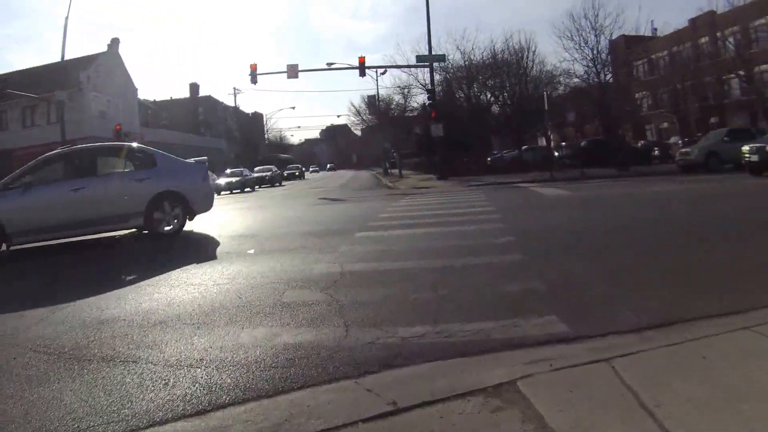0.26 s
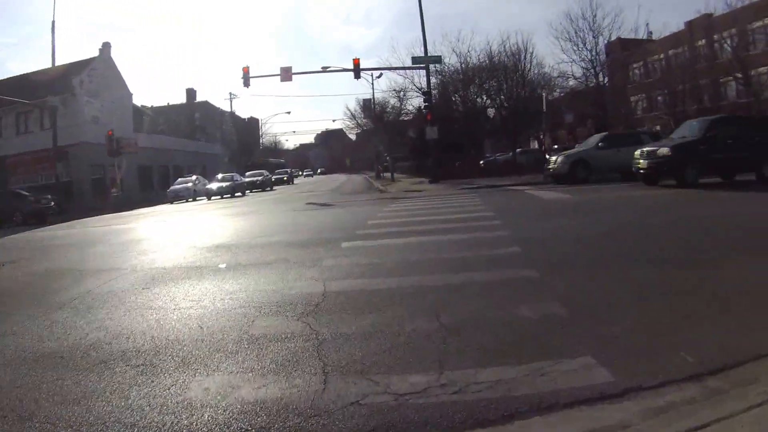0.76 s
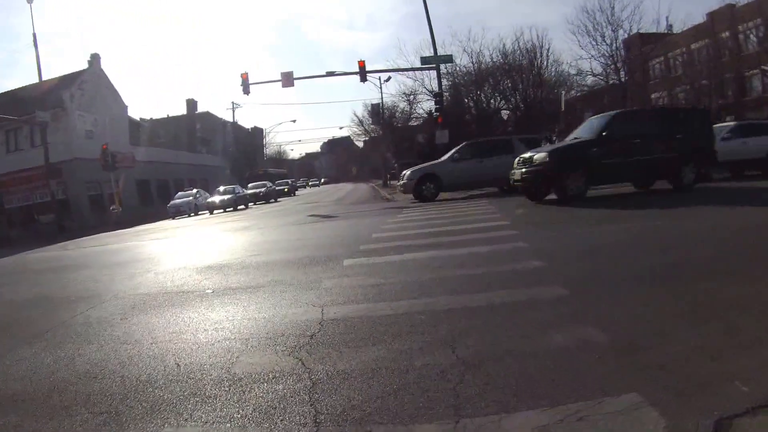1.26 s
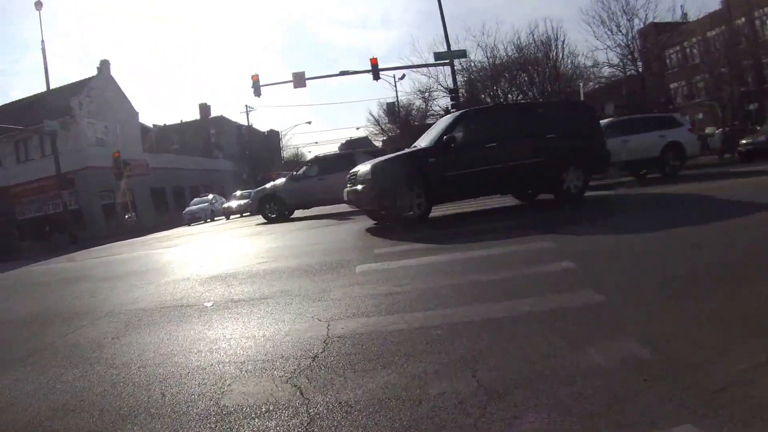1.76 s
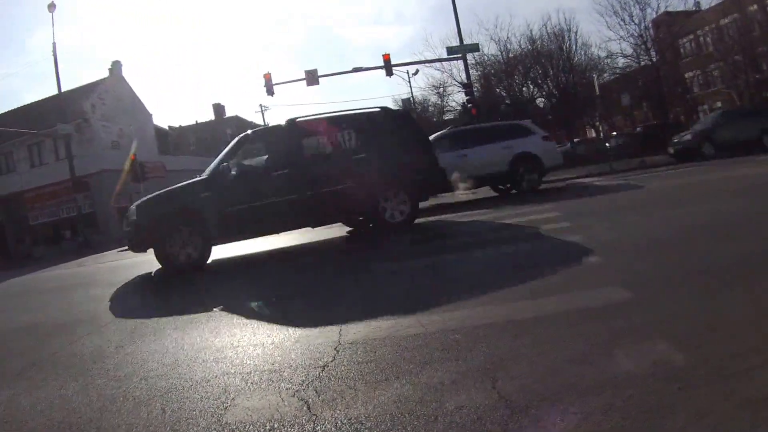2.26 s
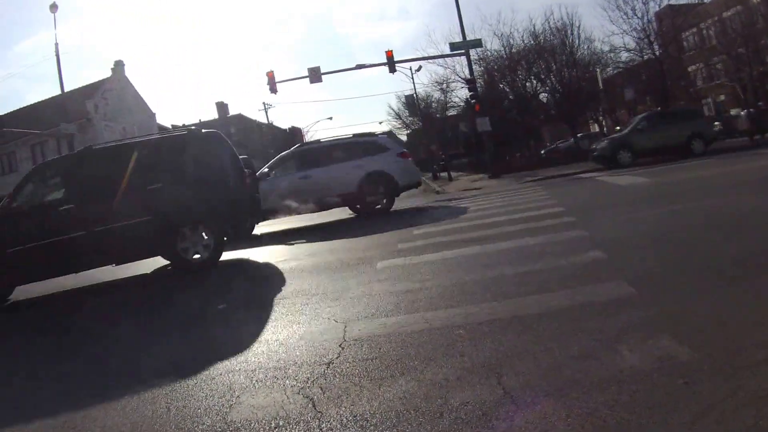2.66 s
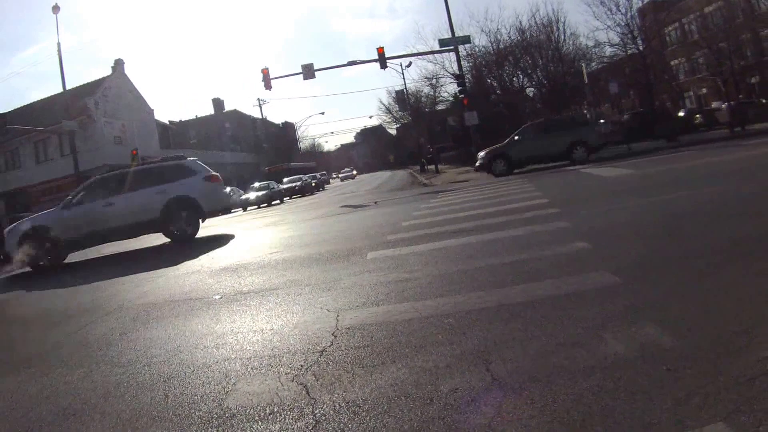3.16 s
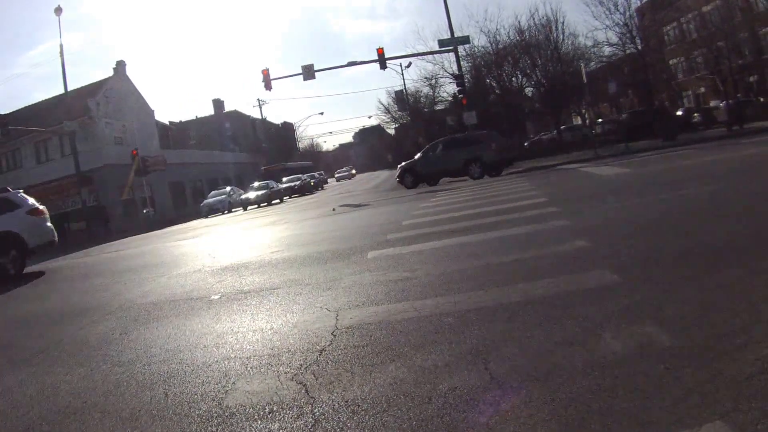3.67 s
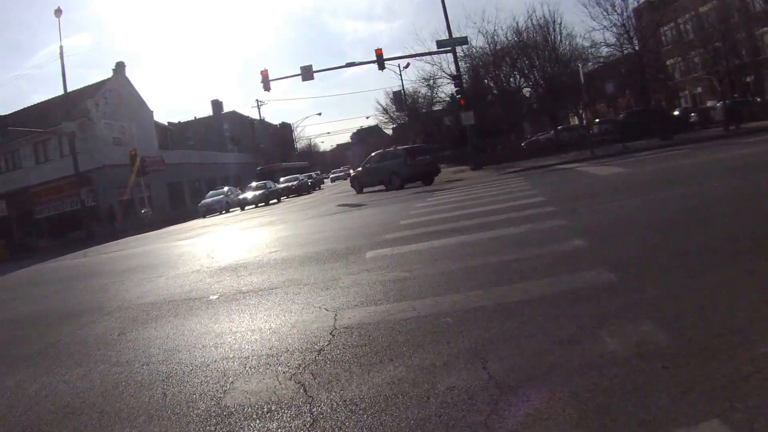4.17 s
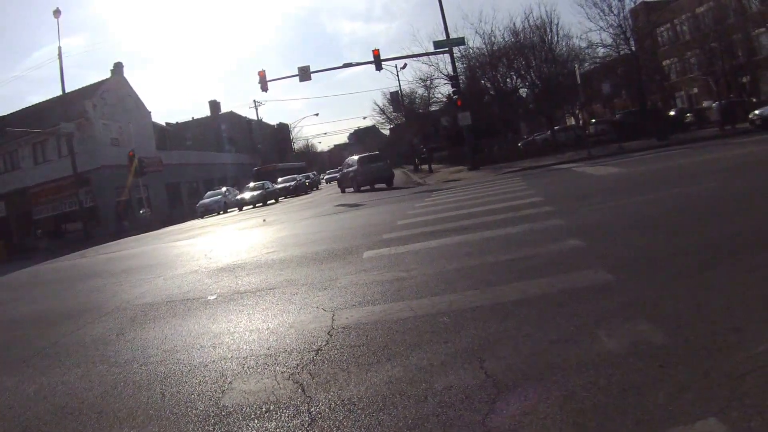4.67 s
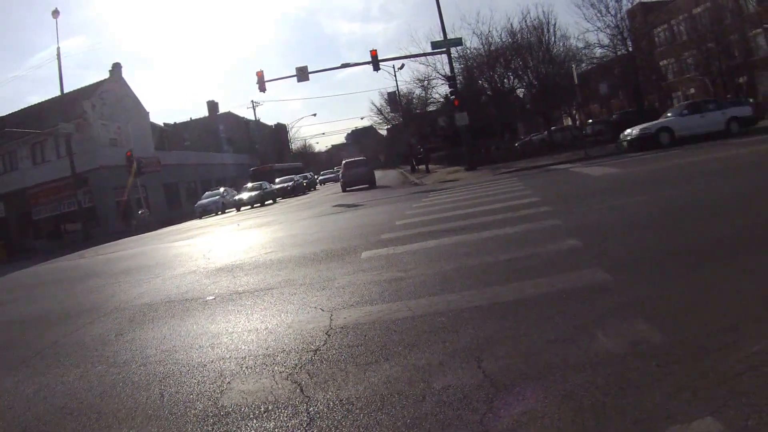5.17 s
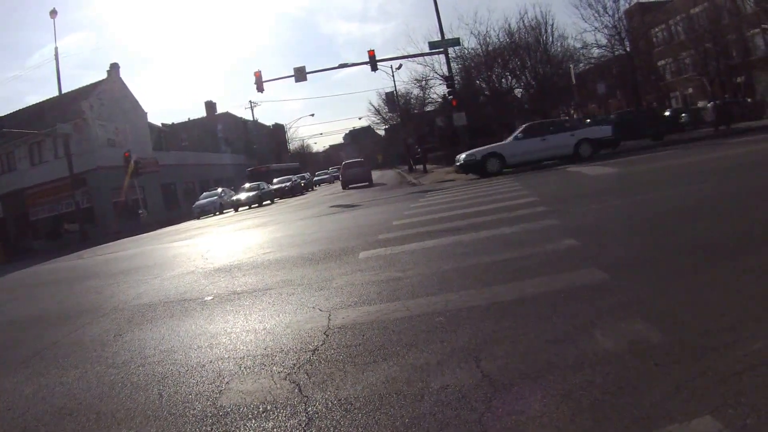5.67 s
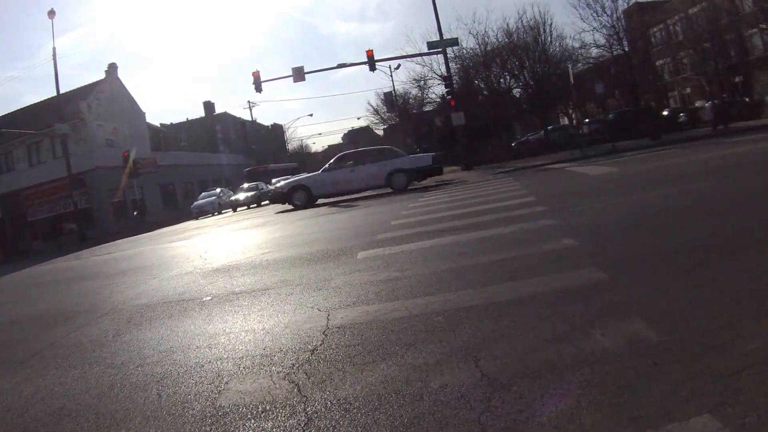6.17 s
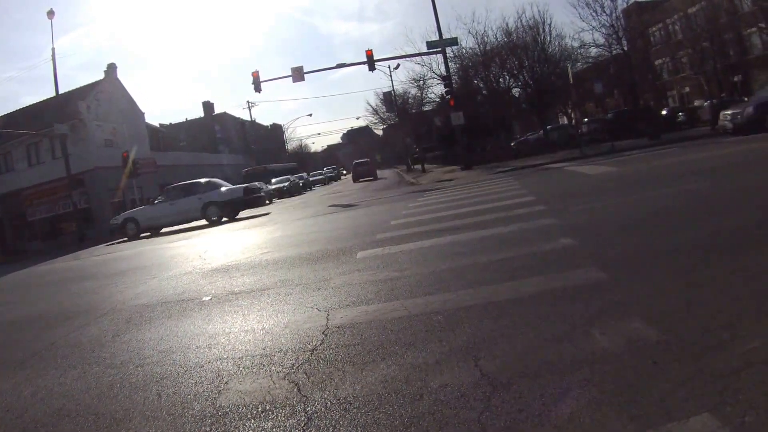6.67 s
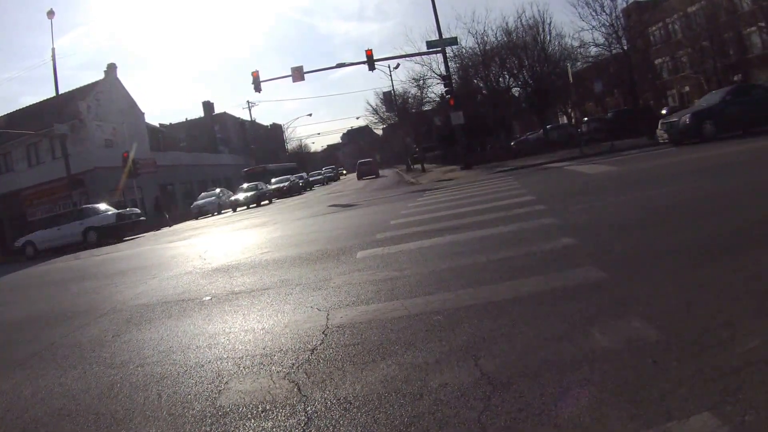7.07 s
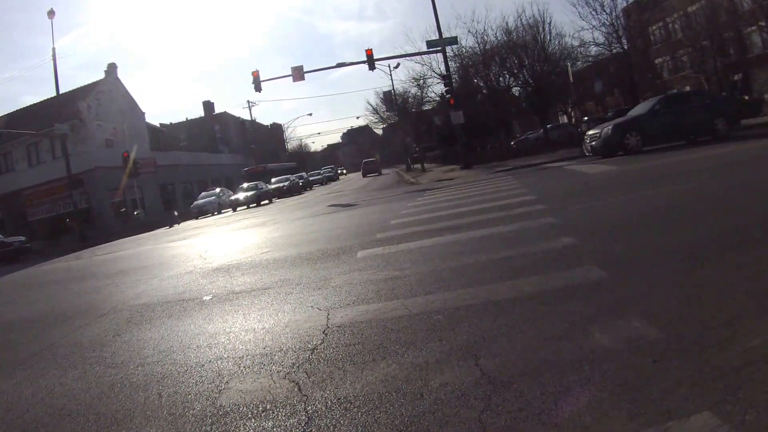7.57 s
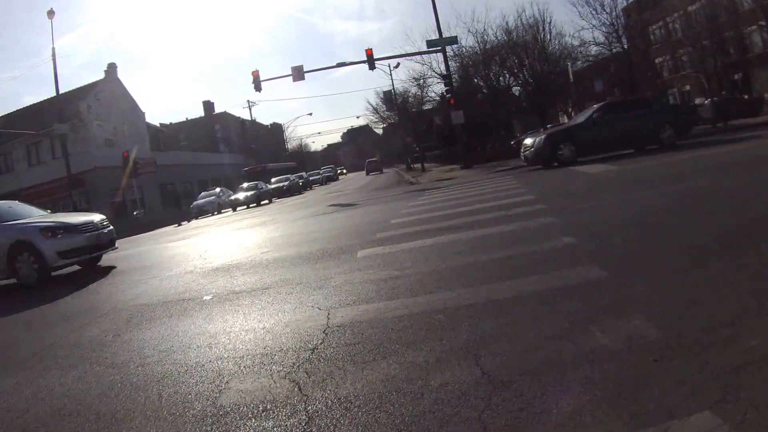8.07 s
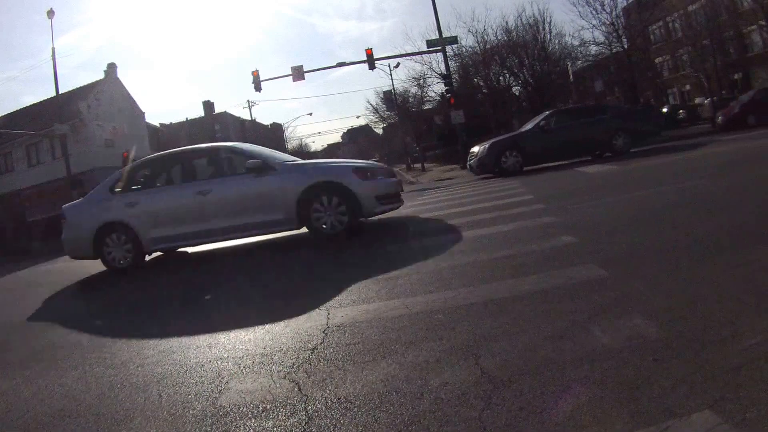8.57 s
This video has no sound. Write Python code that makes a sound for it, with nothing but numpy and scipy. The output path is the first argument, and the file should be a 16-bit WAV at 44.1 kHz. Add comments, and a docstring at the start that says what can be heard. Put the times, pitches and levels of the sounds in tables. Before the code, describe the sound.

Freewheel clicks and low road rumble fade as a bike stops; hard hollow knocks and rattles follow, with a car pulling away late.

```python
"""A bicycle coasts to a halt at a city crossing, heard by a camera clamped to it. Its loose mount slips, knocks
and bounces: short bursts of noise ring the housing, then frame and spokes ring on and the mount rattles.
Loose parts tick softly, the freewheel clicks in runs as teeth pass a pawl, and the tyres rumble as coloured noise.
Behind lie the noisy roar of passing cars, one car pulling away as a climbing set of tones, and a thin hiss."""
import sys
import numpy as np
from scipy import signal
from scipy.fft import rfft, irfft, next_fast_len
from scipy.io import wavfile
from scipy.ndimage import uniform_filter1d

SR = 44100
rng = np.random.default_rng(int(sys.argv[2]) if len(sys.argv) > 2 else 0)


def to_wav(sig):
    """Store sig (one row per channel, or 1-D mono) as 16-bit WAV at the path in sys.argv[1].

    Samples outside -1..1 are clipped; the rate is SR.
    """
    pcm = np.clip(np.atleast_2d(sig), -1, 1) * 32767
    pcm = np.round(pcm).astype(np.int16)
    wavfile.write(sys.argv[1], SR, pcm.T)  # frames by channels


N = 388962
T = np.arange(N) / SR


def undb(db):
    """Turn decibels into gain."""
    return 10 ** (np.asarray(db) / 20)


def unit(x):
    """Scale to rms 1."""
    return x / np.sqrt(np.mean(x ** 2))


def curve(rows):
    """Join (time_s, value) points by straight lines in time."""
    return np.interp(T, *np.transpose(rows))


def add(out, start_s, x):
    """Mix x into out from start_s on."""
    i = max(int(start_s * SR), 0)
    out[i:i + len(x)] += x[:max(N - i, 0)]


def walk(rate_hz):
    """Random levels, each held for 1 / rate_hz and smoothed twice; spread near 1."""
    k = int(SR / rate_hz)
    steps = np.repeat(rng.standard_normal(N // k + 1), k)
    return 1.3 * uniform_filter1d(uniform_filter1d(steps, k), k)[:N]


def colour(x, points):
    """Give x a spectrum of (pitch_hz, level_db) points, falling steeply past its ends; rms 1."""
    hz, db = np.transpose(points)
    size = next_fast_len(N)
    octave = np.log2(np.maximum(np.arange(size // 2 + 1) * SR / size, 1))
    outside = np.abs(octave - np.clip(octave, np.log2(hz[0]), np.log2(hz[-1])))
    gain = undb(np.interp(octave, np.log2(hz), db) - 20 * outside)
    return unit(irfft(rfft(x, size) * gain, size)[:N])


def ring(modes, seconds):
    """Sharply pushed parts ring as fading sines: (pitch_hz, level_db, time to fall 60 dB in s)."""
    t = T[:int(seconds * SR)]
    return sum(undb(db) * np.sin(2 * np.pi * hz * t) * np.exp(-np.log(1000) * t / t60)
               for hz, db, t60 in modes)


def ring_varied(modes, seconds, detune, scatter_db):
    """Each push rings the modes at slightly different pitches and levels."""
    chance = rng.standard_normal((len(modes), 2))
    varied = [(hz * (1 + detune * a), db + scatter_db * b, t60) for (hz, db, t60), (a, b) in zip(modes, chance)]
    return ring(varied, seconds)


# loudness of the thin hiss, before its overall gain: time_s, level_db
HISS_LEVEL = [(0, -88.5), (2.3, -88.5), (2.5, -85.5), (4.1, -87.5), (4.4, -84), (4.75, -82.5), (4.9, -75),
              (5.0, -84.5), (5.6, -81), (5.75, -85.5), (6.65, -89), (6.92, -71.5), (7.25, -71.5),
              (7.29, -81), (8.8, -78)]
# tone of the hiss: pitch_hz, level_db (per Hz, relative)
HISS_TONE = [(1500, -3), (3000, 6), (4500, 2.5), (8000, 0.5), (12000, -0.5), (15000, -7)]


def hiss(hiss_db=2):
    """A thin hiss is high noise that swells and sinks."""
    return colour(rng.standard_normal(N), HISS_TONE) * undb(hiss_db + curve(HISS_LEVEL))


# tone of the street roar: pitch_hz, level_db (per Hz, relative)
STREET_TONE = [(55, -13.5), (115, -8), (175, -6.5), (270, -3.5), (340, -11), (420, -10), (600, -11),
               (720, -7), (800, 1), (900, -14.5), (1200, -17), (1460, -11), (2000, -23.5), (2700, -22),
               (3500, -39), (5000, -41.5)]
# cars crossing close by: nearest_s, level_db there (before the swell)
CAR_PASSES = [(-.1, -60), (3.302, -70), (8.699, -69)]
CAR_SPEED_M_S, LANE_M = 7.6, 7.9
FAR_TRAFFIC_DB = -65.5  # steady traffic, before the swell


def traffic(swell_db, dull=0.59):
    """Tyre roar of crossing cars, coloured by the camera's case; far cars lose their treble first."""
    flutter = undb(.7 * walk(14))
    roar = colour(rng.standard_normal(N) * flutter, STREET_TONE)
    low = signal.sosfiltfilt(signal.butter(2, 1300, fs=SR, output="sos"), roar)
    # power falls with the square of the distance to each car
    cars = sum(undb(db) ** 2 / (1 + (CAR_SPEED_M_S * (T - s) / LANE_M) ** 2) for s, db in CAR_PASSES)
    near_db = 10 * np.log10(cars + undb(FAR_TRAFFIC_DB) ** 2) + swell_db
    far_db = np.minimum(near_db + 57, 0)
    return (low + (roar - low) * undb(dull * far_db)) * undb(near_db)


# tones of the car's exhaust: multiple of the crank speed, level_db (relative)
EXHAUST_TONES = [(2, -17.5), (3, -6), (4.5, 9), (5, -6), (6, -4.5), (7, 0), (7.5, -11), (10, -4.5),
                 (12, -7.5)]
CRANK_LOW_HZ, CRANK_HIGH_HZ = 28, 37.6  # crank turns per second before and after the surge
SURGE_AT_S, SURGE_S = 7.45, .7  # middle and time scale of the surge


def engine(car_db=-58.0, waver=0.0036, rough_db=2):
    """A car gathers speed: its exhaust tones climb together and grow louder with the effort."""
    effort = (1 + np.tanh((T - SURGE_AT_S) / SURGE_S)) / 2
    crank_hz = CRANK_LOW_HZ + (CRANK_HIGH_HZ - CRANK_LOW_HZ) * effort
    turns = np.cumsum(crank_hz * (1 + waver * walk(13))) / SR
    drone = sum(undb(db + rough_db * walk(8.3)) * np.sin(2 * np.pi * k * turns) for k, db in EXHAUST_TONES)
    return unit(drone) * undb(car_db) * effort ** 1.7


# tone of the tyre rumble: pitch_hz, level_db (per Hz, relative)
ROAD_TONE = [(30, -5.5), (45, 1.5), (65, -4), (90, -7), (110, -8), (165, -0.5), (215, -2.5), (310, 8.5),
             (480, -11), (680, -15), (980, -4), (1160, -16.5), (1340, -9.5), (1700, -26), (3000, -49.5),
             (5000, -55.5)]
ROLL_DB, CREEP_DB, BRAKE_DB_PER_S = -50, -52, 44.5
BRAKE_S, STOP_S = 1.52, 4.31  # braking to a creep starts; the bike stops and the rumble fades


def tyres():
    """Rough asphalt shakes the bike in uneven bumps; the rumble dies away as it stops."""
    grit = rng.standard_normal(N) * undb(1.5 * walk(45))
    rolling_db = np.maximum(ROLL_DB - BRAKE_DB_PER_S * np.maximum(T - BRAKE_S, 0), CREEP_DB)
    return colour(grit, ROAD_TONE) * undb(rolling_db - BRAKE_DB_PER_S * np.maximum(T - STOP_S, 0))


# the whole bike swaying on its tyres: pitch_hz, level_db (relative), fall_60_db_s
SWAY_MODES = [(31, -7, .5), (44.43, -7.5, 0.97), (60.6, -10.5, 0.82), (125, -15.5, 0.15)]


def sway(pushes, seconds):
    """Pushes set the whole bike swaying on its tyres in deep, short-lived tones."""
    return signal.fftconvolve(pushes, ring(SWAY_MODES, seconds))[:N]


# runs of freewheel clicks: first_click_s, last_click_s, level_db in mid-run (before scatter and click gain)
CLICK_RUNS = [(.017, .04, -29), (.146, .169, -38), (.238, .262, -35), (.32, .342, -36), (.359, .382, -26),
              (.405, .405, -32), (.47, .494, -30), (.566, .657, -34), (.718, .967, -33.5),
              (1.017, 1.225, -32.5), (1.248, 1.248, -27), (1.304, 1.328, -31), (1.367, 1.499, -35),
              (2.489, 2.535, -30), (3.177, 3.202, -24), (3.263, 3.33, -21), (5.739, 5.762, -24)]
TOOTH_S, RUN_EDGE_DB, CLICK_SCATTER_DB = .0226, -5.5, 1.4
IDLE_CLICK_DB = -51.5  # between the runs the pawl barely catches


def pawl_clicks():
    """Evenly spaced teeth pass the pawl, each run swelling and fading, faint ones between: (start_s, level_db)."""
    teeth = []
    for first, last, db in CLICK_RUNS:
        for place in np.linspace(-1, 1, round(abs(last - first) / TOOTH_S) + 1):  # -1 and 1 are the run's ends
            teeth.append(((first + last + place * (last - first)) / 2, db + RUN_EDGE_DB * place ** 4))
    teeth += [(s, IDLE_CLICK_DB) for s in np.arange(0, BRAKE_S, TOOTH_S)
              if min(abs(s - loud) for loud, _ in teeth) > TOOTH_S / 2]
    return [(s, db + CLICK_SCATTER_DB * luck) for (s, db), luck in zip(teeth, rng.standard_normal(len(teeth)))]


# what a click rings in hub and frame, before scatter: pitch_hz, level_db (relative), fall_60_db_s
HUB_MODES = [(169.6, -13.5, 0.045), (322, -3, 0.019), (2024, -23, 0.022), (2240, -22.5, 0.011),
             (2610, -23.5, 0.016), (2900, -31.5, 0.024), (2900, -55, 0.038), (4480, -29.5, 0.0041),
             (5100, -29, 0.0055)]


def freewheel(click_db=4, second_db=-15, sway_db=-20, soft_hz=4000, most_db=-34, detune=0.015, scatter_db=2):
    """Each pawl click rings the hub and nudges the bike's sway; a weaker pawl drops about half a tooth later."""
    clicks, nudges = np.zeros(N), np.zeros(N)
    for s, db in pawl_clicks():
        hub = ring_varied(HUB_MODES, 0.076, detune, scatter_db)
        add(nudges, s, undb([min(db, most_db) + click_db]))  # a loud click moves the bike no further
        add(clicks, s, hub * undb(db + click_db))
        add(clicks, s + 0.012, hub * undb(db + click_db + second_db))
    soften = signal.butter(2, min(soft_hz, SR / 3), fs=SR, output="sos")
    return undb(sway_db) * sway(nudges, 0.98) - signal.sosfilt(soften, clicks)


# soft ticks on the housing, most of them from loose parts: start_s, level_db (before the tick gain)
LOOSE_TICKS = [(1.8284, -54.5), (1.8544, -70), (1.8706, -74), (1.9939, -70), (2.0602, -72), (2.109, -70),
               (2.577, -62), (2.6459, -72), (2.7013, -71), (2.9441, -66), (3.0629, -65), (3.354, -61),
               (3.496, -58), (3.5409, -65), (3.6223, -66), (3.7414, -62), (3.795, -57), (4.2009, -61),
               (4.3053, -61), (5.0047, -55.5), (5.0676, -62)]


def loose_ticks(brush_s=0.0092, tick_db=-6, low_hz=1900):
    """Soft, dull ticks of noise brush the housing, most of them from loose parts."""
    out, n = np.zeros(N), int(brush_s * SR)
    # only the upper middle modes answer so slight a touch
    band = signal.butter(3, [low_hz, 5000], "band", fs=SR, output="sos")
    light = signal.sosfilt(band, ring(MOUNT_MODES, .05))
    for s, db in LOOSE_TICKS:
        tick = signal.fftconvolve(rng.standard_normal(n) * np.hanning(n), light)
        level = undb(db + tick_db) * np.sqrt(SR / 100)  # level over 10 ms
        add(out, s - brush_s / 4, tick * level / np.linalg.norm(tick))
    return out


# every knock leaves the mount rattling, relative to its thud
RATTLE_DB, RATTLE_FALL_DB_PER_S = -21, 103
# the bike is dragged about and the mount scrapes on: start_s, length_s, level_db (before the rattle gain)
BIKE_DRAGS = [(2.49, 0.28, -35.5), (3.176, 0.09, -27.5), (3.382, 0.64, -43.5), (5.619, 0.25, -33)]
DRAG_ATTACK_S, DRAG_FADE_DB_PER_S = 0.0044, 29


def shaking():
    """How hard the mount rattles: knocks and drags set it going, and it settles at one rate."""
    power = np.zeros(N)
    t = T[:SR]
    for s, _, _, thud, *_ in MOUNT_KNOCKS:
        add(power, s, undb(thud + RATTLE_DB - RATTLE_FALL_DB_PER_S * t) ** 2)
    for s, length, db in BIKE_DRAGS:
        # the drag fades slowly while it lasts, then the rattle settles as well
        fall_db = DRAG_FADE_DB_PER_S * t + RATTLE_FALL_DB_PER_S * np.maximum(t - length, 0)
        add(power, s, (np.minimum(t / DRAG_ATTACK_S, 1) * undb(db - fall_db)) ** 2)
    return np.sqrt(power)


def rattle(rate_hz=700, spread_db=5.0, bright_db=-1, top_hz=2400, judder_db=1.5, rattle_db=-1):
    """Small juddering contacts ring the same housing modes, too light to boom and too soft to fizz."""
    hits = (rng.random(N) < rate_hz / SR) * rng.choice([-1, 1], N)
    contacts = hits * undb(spread_db * np.minimum(rng.exponential(size=N), 3))
    contacts = unit(contacts * undb(judder_db * walk(90))) * shaking()
    # tilt the modes by bright_db per octave
    housing = ring([(hz, db + bright_db * np.log2(hz / 300), t60) for hz, db, t60 in MOUNT_MODES], .14)
    band = signal.butter(3, [135, min(top_hz, SR / 3)], "band", fs=SR, output="sos")
    light = signal.sosfilt(band, housing)
    return signal.fftconvolve(contacts, light / np.linalg.norm(light))[:N] * undb(rattle_db)


# frame tubes and handlebar ring on: pitch_hz, level_db (relative), fall_60_db_s
FRAME_MODES = [(363, -3, 1.7), (449, -7.5, 2.4), (486, -8, 2.4), (520, -11.5, 2), (641, -15, 1.1),
               (785, 3, 0.44), (800, -10, 0.82), (878, -3, 1.5), (896, -10.5, 1.5), (938, -2, 0.56),
               (980, -16, 2.3), (1020, -14.5, 1.6), (1070, -17.5, 1.9), (1500, -9, 0.69)]


def frame(blows, frame_db=-48.5, boom_mute=0.43, spoke_db=-11, spoke_tilt_db=-6, spoke_t60=2.38, give=0.52,
          sway_db=-27, sway_give=0.46, boom_rock=0.95, drag_db=-9):
    """Knocks ring the frame and unevenly tensioned spokes and rock the bike; hard blows pass on a smaller share."""
    spoke_hz = np.linspace(295, 460, num=28) * rng.uniform(.985, 1.015, size=28)
    spokes = [(hz, spoke_db + spoke_tilt_db * np.log2(hz / 300), spoke_t60) for hz in spoke_hz]
    pushes, rocks = np.zeros(N), np.zeros(N)
    for s, contact, thud, boom, *_ in blows:
        # a boomy blow rings less and rocks more; a longer push rocks more too
        end_s = s + contact / 2
        add(pushes, end_s, undb([give * thud - boom_mute * boom + frame_db]))
        add(rocks, end_s, undb([sway_give * thud + boom_rock * boom + sway_db]) * min(contact / SCRAPE_S, 1))
    for s, _, db in BIKE_DRAGS:
        add(rocks, s, undb([db + drag_db]))
    # each spoke is pulled one way or the other, so together they hum rather than click
    body = ring(FRAME_MODES, 2) + sum(rng.choice([-1, 1]) * ring([spoke], 2) for spoke in spokes)
    return signal.fftconvolve(pushes, body)[:N], sway(rocks, 0.9)


# knocks on the mount: start_s, slip_before_s, contact_s, thud_db, then relative to the thud:
# boom_db, clack_db, snap_db
MOUNT_KNOCKS = [(1.8, 0.0067, 0.0044, -17, -28, -11.5, -22), (2.168, 0.0074, 0.0096, -32, -19, -20, -21.5),
                (2.189, 0.00098, 0.0064, -40, -0.5, -1.5, -6), (2.21, 0.002, 0.0055, -32, -11, -12, -25),
                (2.299, 0.00042, 0.0051, -33.5, -17, -7, -26.5),
                (2.333, 0.00068, 0.0085, -41.5, -7, -8, -24), (2.489, .011, 0.0079, -29, -1.5, -37, -21),
                (2.512, 0.002, 0.00678, -32, -35.5, -16, -28),
                (2.74, 0.0037, 0.0077, -21, -10.5, -14, -23.5),
                (2.872, 0.011, 0.0059, -45.5, -17, -7, -8.5), (3.174, 0.0026, 0.0071, -25, -11, -14.5, -34),
                (3.234, 0.0003, 0.0076, -19.5, -11, -5, -19),
                (3.282, 0.0068, 0.0048, -20.5, -6.5, -14, -14.5),
                (3.306, 0.0018, 0.0055, -32, -12, -30, -14), (3.652, 0, .017, -49.5, -15, 8, 1.5),
                (3.667, 0.0037, 0.0036, -29.5, -27.5, 1.5, 5.5),
                (3.856, 0.00025, 0.0091, -41, -14.5, 6.5, -9),
                (3.885, 0.00094, .015, -24, -36.5, -3.5, -24),
                (3.951, 0.0019, 0.0073, -25, -11, -11, -24.5), (3.975, 0.00024, 0.008, -33, -9.5, -16, -20),
                (4.148, 0.0027, 0.0071, -29, -38.5, -1, -14),
                (4.173, 0.00041, 0.0042, -30.5, -17.5, -14, -33),
                (4.249, 0.0012, 0.02, -41.5, 6.5, -6.5, -13), (4.809, 0.00053, 0.037, -45, -25, 3.5, -8),
                (4.924, 0.015, 0.005, -16, -19, -3, -25), (4.963, 0, 0.0073, -19.5, -11.5, -7.5, -22.5),
                (5.458, 0.00091, .016, -52, -6.5, -9, -25), (5.623, 0.0036, 0.0049, -19.5, -9, -3.5, -23),
                (5.677, 0.00055, 0.0073, -22, -17.5, -8, -21.5), (5.737, 0, 0.006, -22.5, -3, -6.5, -16),
                (5.818, 0.00017, 0.0074, -23, -12.5, -9.5, -22.5),
                (5.871, 0.00043, 0.0069, -27, -10, -10, -22), (5.95, 0, 0.018, -46, -3, -3, -9.5),
                (6.058, 0.0046, 0.013, -55, -4, -7, -9), (6.158, 0.0017, .016, -59.5, -12, -3, -11),
                (6.627, 0.012, 0.0075, -24, -40, -1.5, -25), (7.024, 0.0013, 0.051, -32.5, -9.5, -8.5, -28),
                (7.264, 0.0079, 0.0023, -18.5, -0.5, -19, -14.5), (7.379, 0.001, 0.062, -53, 7.5, 4, 6)]
# a slipping mount grates harder the longer it slides before it catches
SLIP_DB, SLIP_DB_PER_S = -20, 1101.5
# tone of a slip, relative to its thud: boom_db, clack_db, snap_db
SLIP_COLOUR = (-8.5, 0.37, -18)
# the camera springs back and lands again, weaker and softer
BOUNCE_S, BOUNCE_SCATTER_S, BOUNCE_DB, BOUNCE_CONTACT_S = 0.02, 0.0027, -15.5, 0.009
# tone of a bounce, relative to its thud: boom_db, clack_db, snap_db
BOUNCE_COLOUR = (-2, -23, -17.5)
SCRAPE_S = .016  # a contact this long or longer only scrapes and does not bounce


def mount_blows():
    """A knock is a slip, the blow and a bounce: (start_s, contact_s, thud_db, boom_db, clack_db, snap_db)."""
    blows = []
    for s, slip, contact, thud, *tone in MOUNT_KNOCKS:
        blows.append((s, contact, thud, *tone))
        if slip > 0:
            blows.append((s - slip, slip, thud + SLIP_DB + SLIP_DB_PER_S * slip, *SLIP_COLOUR))
        if contact < SCRAPE_S:
            bounce_s = s + BOUNCE_S + BOUNCE_SCATTER_S * rng.standard_normal()
            blows.append((bounce_s, BOUNCE_CONTACT_S, thud + BOUNCE_DB, *BOUNCE_COLOUR))
    return blows


# edges between the pitch bands of a knock (boom, thud, clack, snap, tick, fizz): pitch_hz
BAND_EDGES = [95, 215, 680, 1380, 2050, 4500, 13000]
# camera housing and mount, before scatter: pitch_hz, level_db (relative), fall_60_db_s
MOUNT_MODES = [(87, -26.5, .09), (151, 4.5, 0.12), (248.7, 0, 0.075), (300.6, 11.5, 0.051),
               (345.2, 7, .042), (515.7, -2, 0.054), (636, -17.5, 0.13), (824, 2, 0.064),
               (890, -3.5, 0.045), (1037, 6, 0.031), (1240, -8.5, 0.099), (1337, -12.5, 0.074),
               (1456, -17, .07), (1720, -18, 0.039), (2050, -14.5, .035), (2330, -11, 0.036),
               (2665, -15, 0.054), (3030, -36.5, .014), (4300, -37.5, .008), (4440, -17, 0.015),
               (6400, -42.5, .006), (8400, -41.5, .005)]


def knocks(blows, detune=0.016, scatter_db=2.5, chatter=3.77, tick_db=-8, fizz_db=-17, hardness_db=7):
    """The mount chatters briefly at each knock; where and how hard it is hit sets the share of each pitch band."""
    out = np.zeros(N)
    bands = [signal.butter(4, pair, "band", fs=SR, output="sos") for pair in zip(BAND_EDGES, BAND_EDGES[1:])]
    for s, contact, thud, boom, clack, snap in blows:
        housing = ring_varied(MOUNT_MODES, .14, detune, scatter_db)
        n = int(np.clip(1.7 * contact * SR, 60, 4000))
        force = rng.standard_normal(n) * np.hanning(n)
        force *= chatter / np.linalg.norm(force)
        force[n // 2] += contact < SCRAPE_S  # a short knock has one main blow; a long one only scrapes
        blow = signal.fftconvolve(force, housing)
        # a shorter contact reaches higher up
        hard_db = hardness_db * np.log2(0.004 / np.clip(contact, .002, .008))
        # the top grows more slowly than a strong snap
        tick = min(snap, snap / 2 - 11) + tick_db + hard_db / 2
        fizz = tick + fizz_db + hard_db
        for band, db in zip(bands, (boom, 0, clack, snap, tick, fizz)):
            part = signal.sosfilt(band, blow)
            level = undb(thud + db) * np.sqrt(SR / 100)  # level over 10 ms
            add(out, s - contact / 2, part * level / np.linalg.norm(part))
    return out


QUIET_HISS_DB = -86  # hiss curve level at which street and ringing are neither raised nor lowered


def scene(ring_swell=0.58, street_swell=0.97):
    """Everything reaches the one microphone, mostly through the bike itself."""
    # the street and the faint ringing swell and sink with the hiss
    swell_db = curve(HISS_LEVEL) - QUIET_HISS_DB
    background = hiss() + traffic(street_swell * swell_db) + engine()
    blows = mount_blows()
    ringing, rocking = frame(blows)
    bike = tyres() + freewheel() + loose_ticks() + rattle()
    bike += ringing * undb(ring_swell * swell_db) + rocking + knocks(blows)
    return (background + bike)[None]


TOP_HZ = 15300


def record(dry):
    """The camera drops the deepest bass and cuts the top."""
    thin = signal.sosfilt(signal.butter(3, 30, "high", fs=SR, output="sos"), dry)
    return signal.sosfilt(signal.ellip(8, .2, 70, TOP_HZ, fs=SR, output="sos"), thin)


dry = scene()
out = record(dry)
to_wav(out)
```